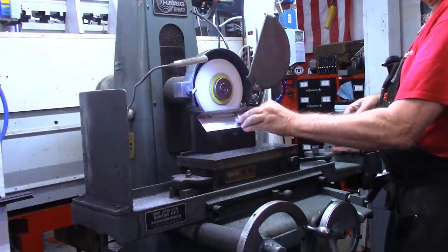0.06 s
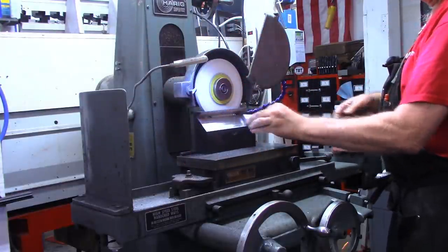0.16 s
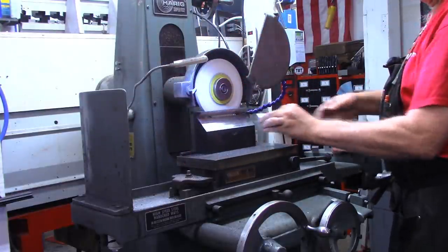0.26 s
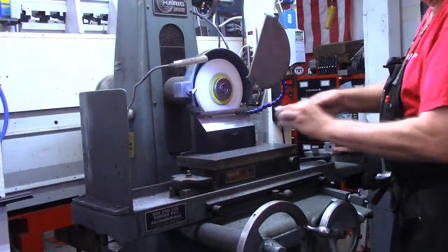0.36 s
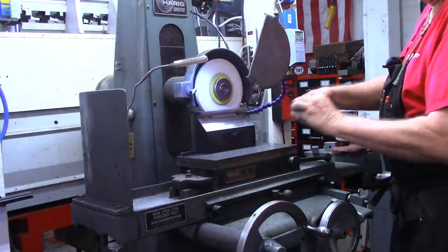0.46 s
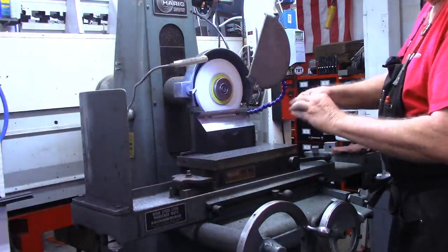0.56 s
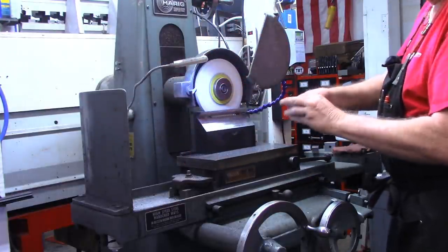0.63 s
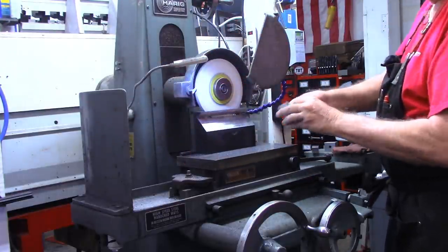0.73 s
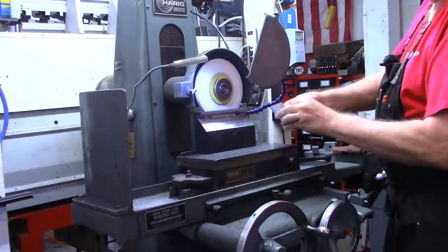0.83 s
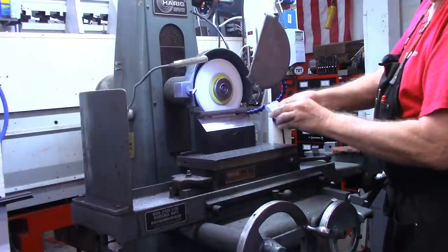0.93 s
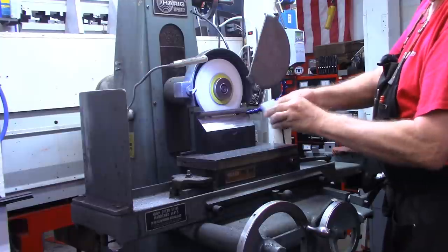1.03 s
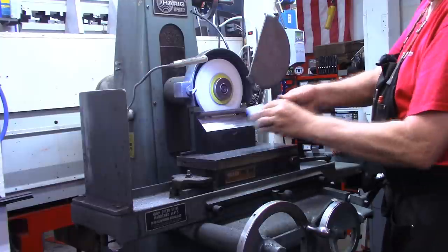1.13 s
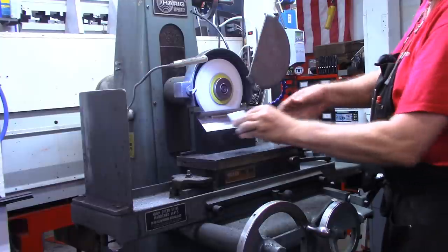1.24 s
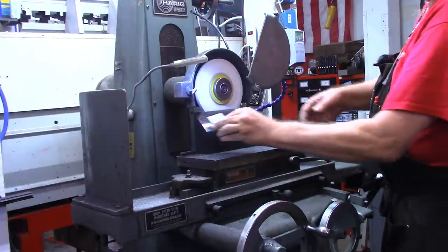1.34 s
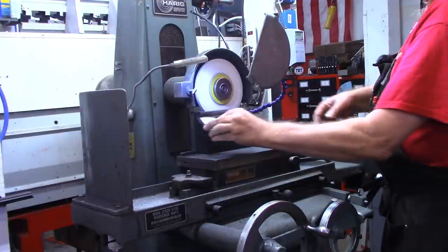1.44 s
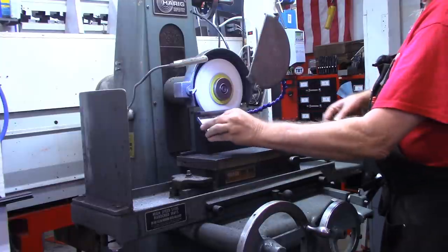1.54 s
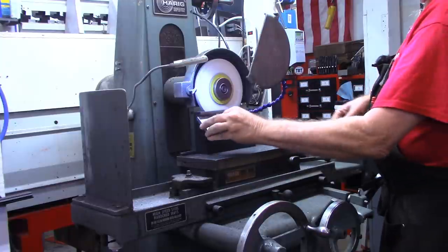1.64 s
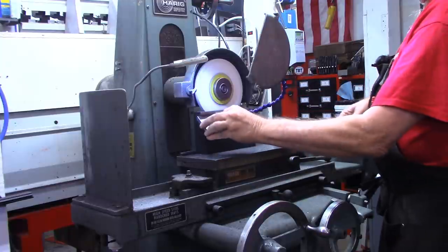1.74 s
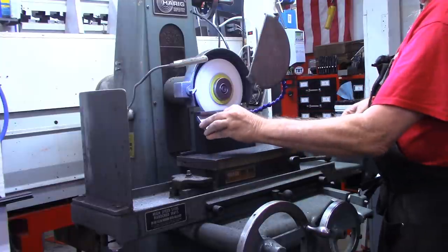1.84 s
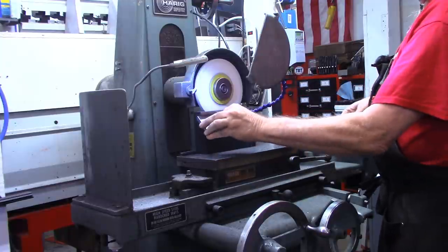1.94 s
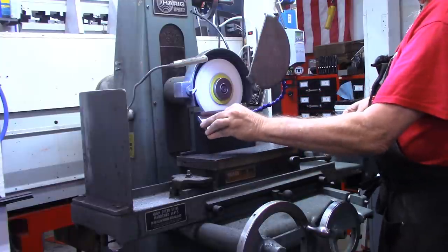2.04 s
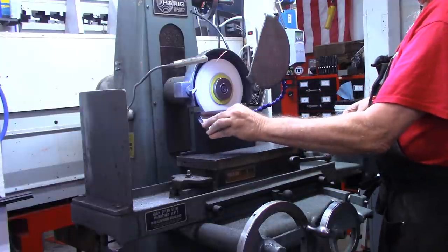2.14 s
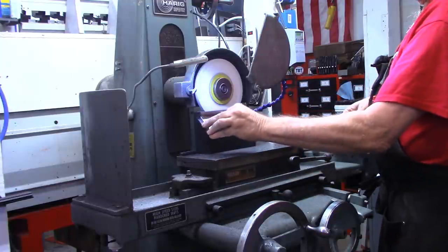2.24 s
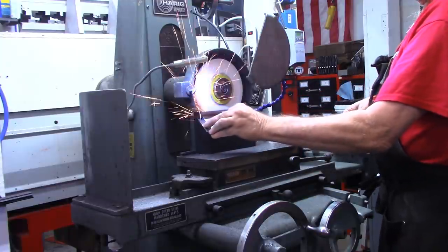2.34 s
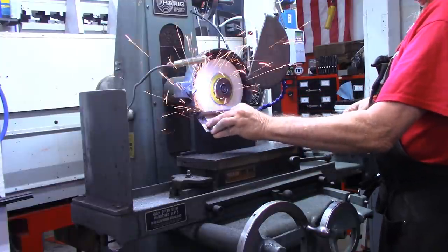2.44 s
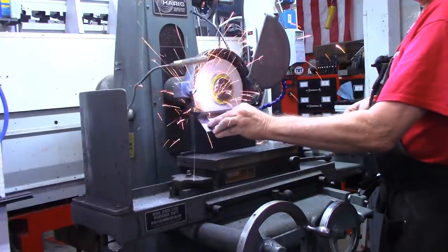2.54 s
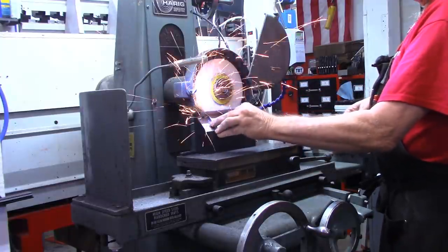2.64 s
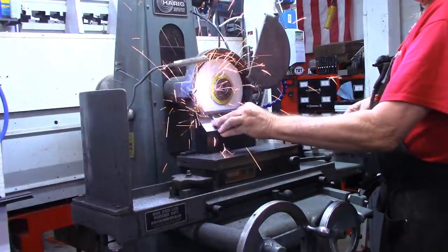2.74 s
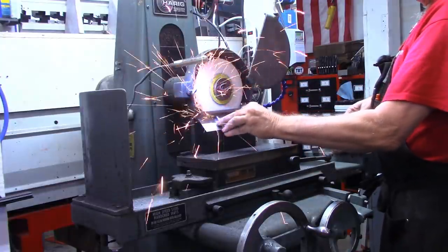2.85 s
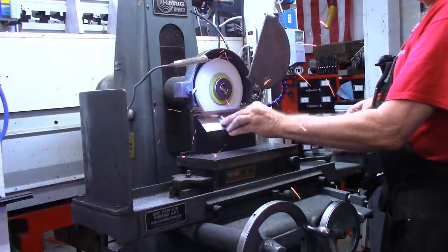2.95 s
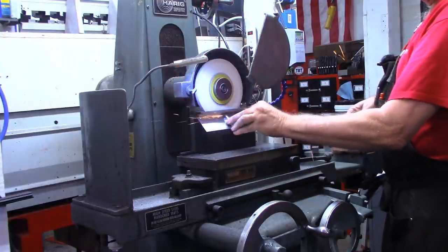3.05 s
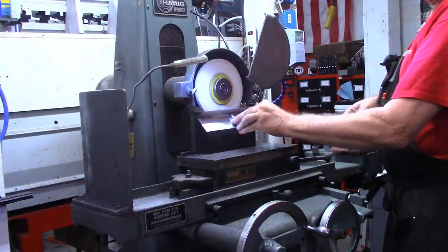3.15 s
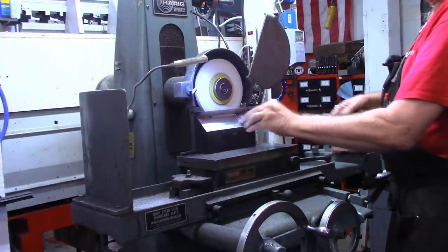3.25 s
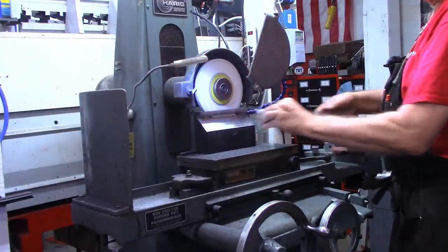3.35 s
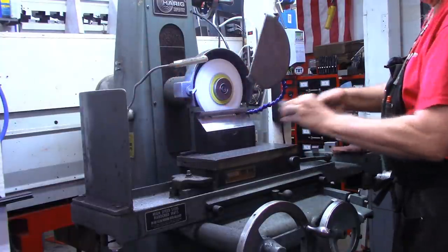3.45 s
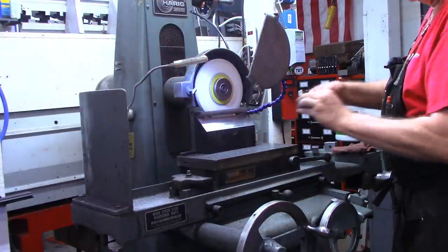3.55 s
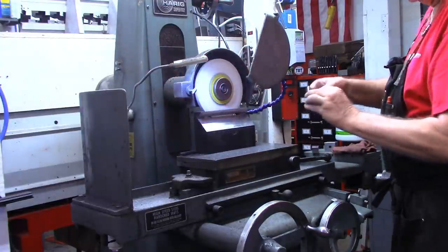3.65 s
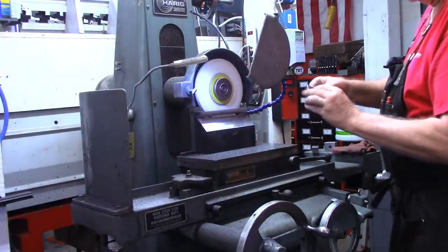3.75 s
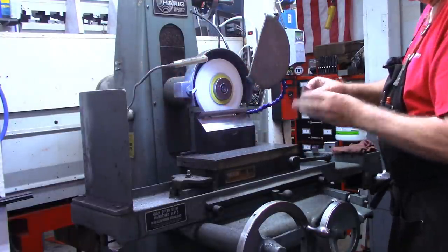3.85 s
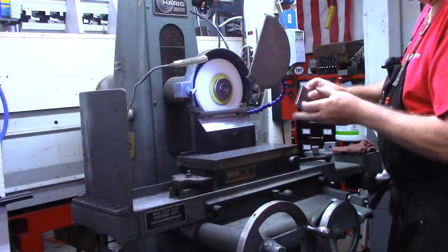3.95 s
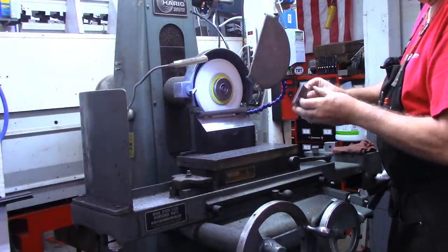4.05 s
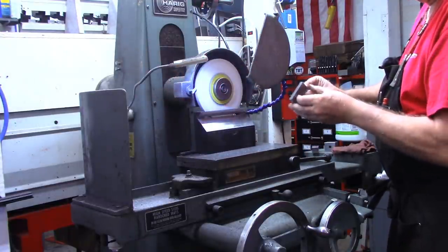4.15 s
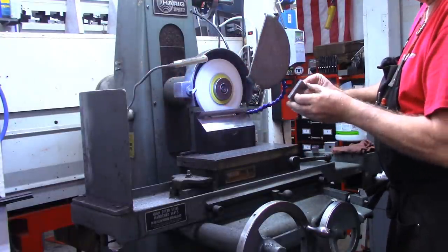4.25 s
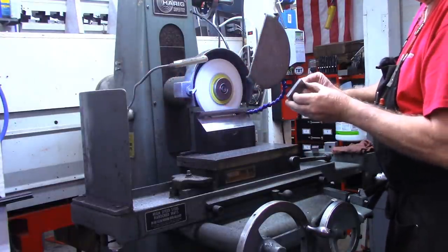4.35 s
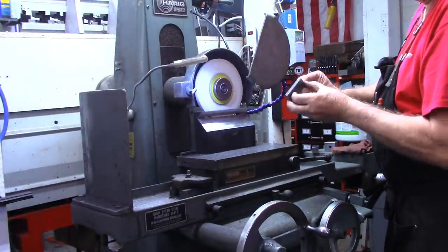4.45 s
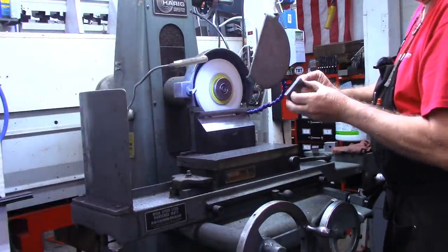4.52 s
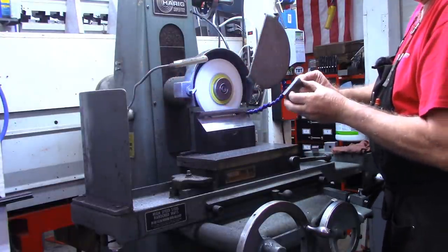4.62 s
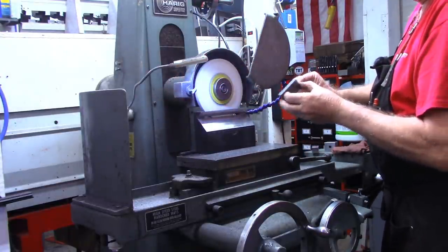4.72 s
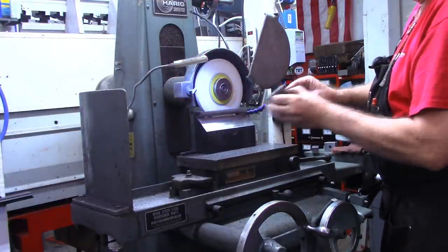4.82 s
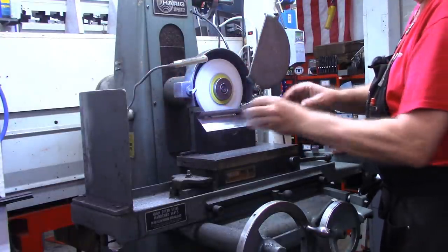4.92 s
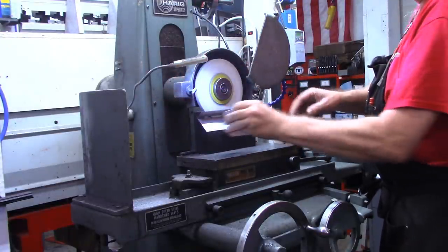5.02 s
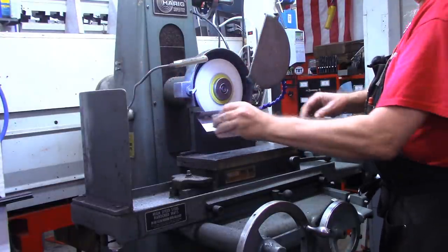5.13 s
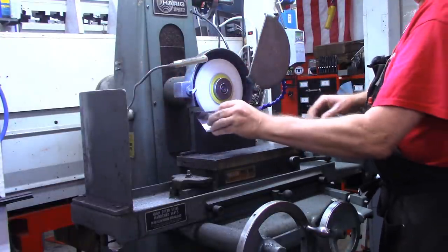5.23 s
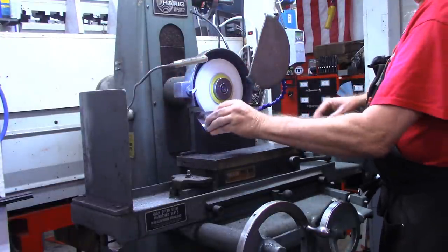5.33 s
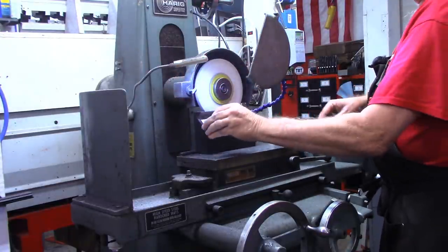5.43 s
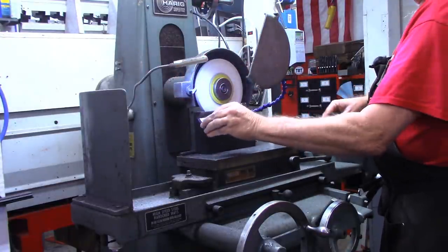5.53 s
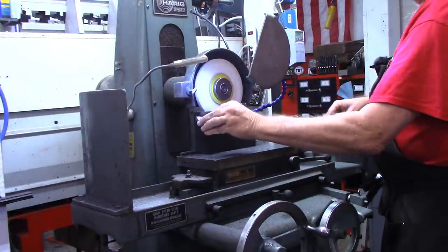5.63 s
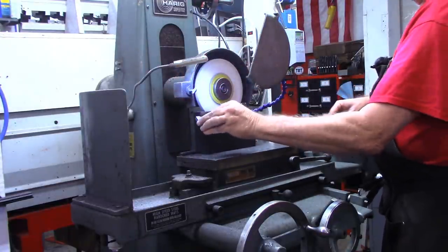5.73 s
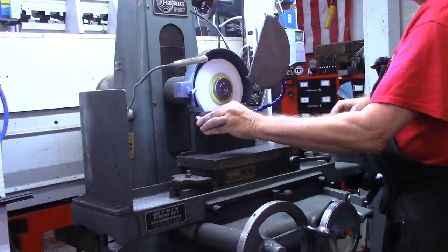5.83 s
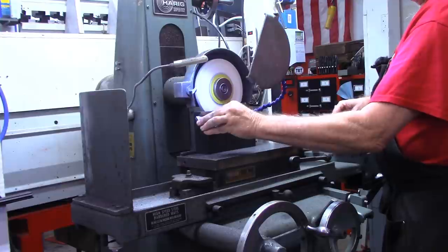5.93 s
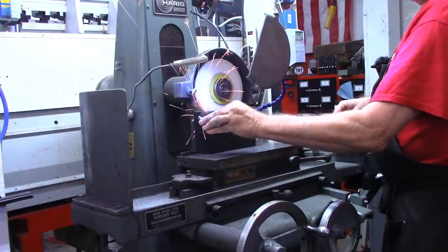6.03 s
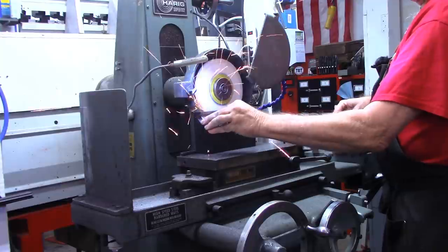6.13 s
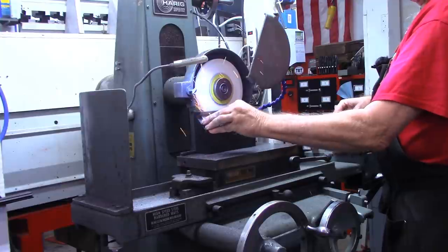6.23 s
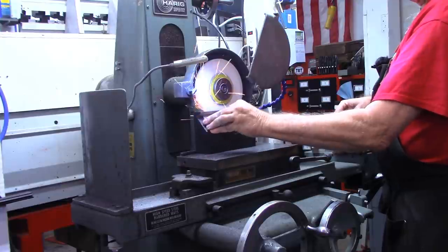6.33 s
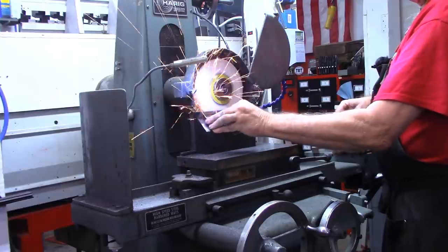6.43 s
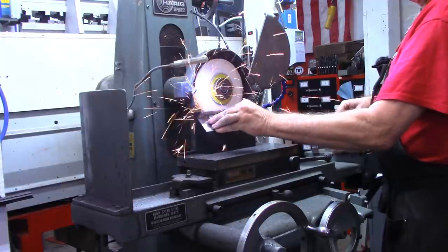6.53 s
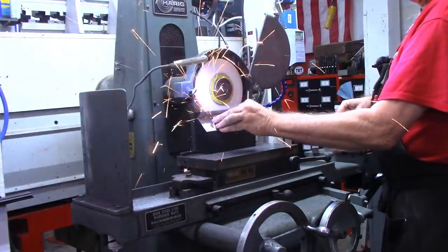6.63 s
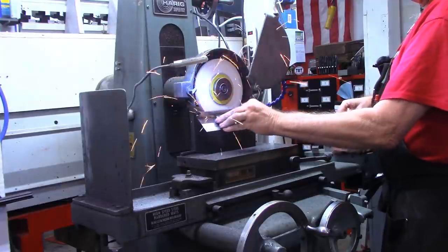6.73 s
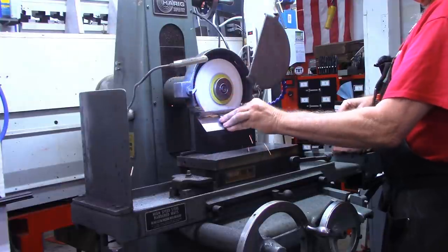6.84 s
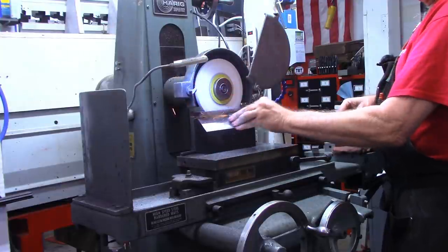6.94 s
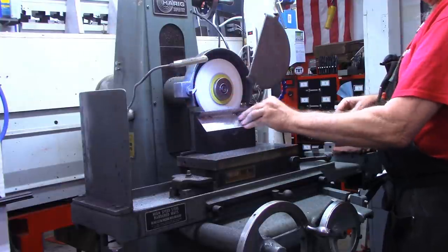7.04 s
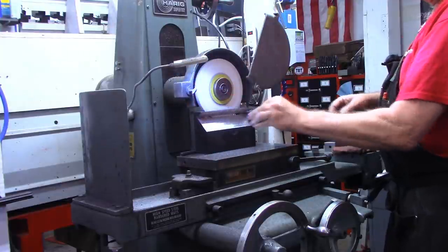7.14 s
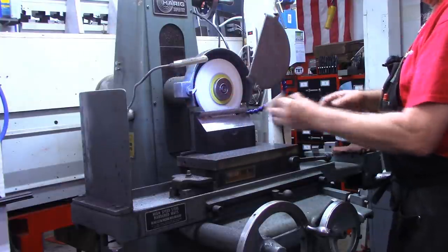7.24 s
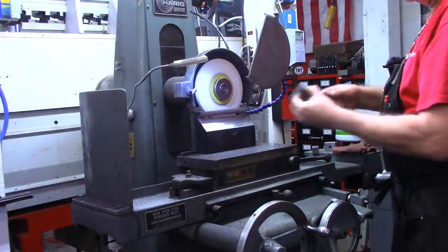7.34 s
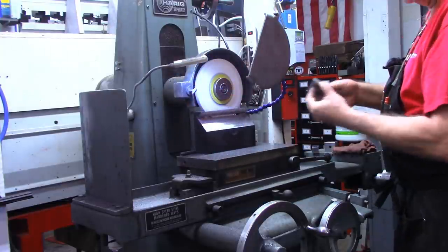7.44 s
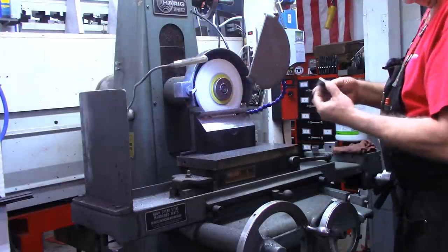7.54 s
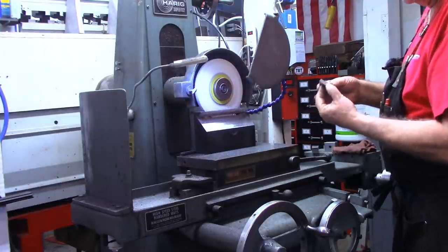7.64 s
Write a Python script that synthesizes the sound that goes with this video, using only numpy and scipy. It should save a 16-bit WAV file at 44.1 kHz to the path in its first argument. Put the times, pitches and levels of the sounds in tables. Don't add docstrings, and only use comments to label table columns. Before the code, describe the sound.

Faint motor hum and airy whirr, broken twice by a piercing, gritty metallic screech as steel is drawn under a grinding wheel.

```python
import sys
import numpy as np
from scipy import signal
from scipy.fft import rfft, irfft, next_fast_len
from scipy.io import wavfile
from scipy.ndimage import uniform_filter1d, map_coordinates

SR = 44100
rng = np.random.default_rng(int(sys.argv[2]) if len(sys.argv) > 2 else 0)


def voltage_ratio(level):
    return 10 ** (np.asarray(level, float) / 20)


def output_pcm(signal):
    pcm = np.clip(np.atleast_2d(signal).T, -1, 1) * 32767
    wavfile.write(sys.argv[1], SR, np.round(pcm).astype(np.int16))


N = 338688
TOP_HZ = 15340


def unit(x):
    return x / np.sqrt(np.mean(x ** 2) + 1e-20)


def along(points, hz):
    f, v = np.transpose(points)
    return np.interp(np.log(hz + 1), np.log(f + 1), v)


def wobble(rate):
    return map_coordinates(rng.standard_normal(int(N * rate / SR) + 4), [np.arange(N) * rate / SR])


def filtered(x, response):
    m = next_fast_len(N + SR // 2)
    return irfft(rfft(x, m) * response(np.fft.rfftfreq(m, 1 / SR)), m)[:N]


def colour(points):
    return lambda f: voltage_ratio(along(points, f))


def modes(table, shift=1, damp=1):
    def peak(f, hz, width):
        return 1j * f * width / (hz * hz - f * f + 1j * f * width)

    def response(f):
        total = 0
        for hz, width, db in table:
            ring = peak(f, hz * shift, width * damp) * peak(f, hz, 1300 + 4 * width)
            total = total + voltage_ratio(db) / np.sqrt(damp) * ring
        return total
    return response


def steep(table):
    return lambda f: modes(table)(f) ** 2


def driven(force, db, response):
    size = np.sqrt(np.mean(np.abs(response(np.arange(1, TOP_HZ + 900, 2))) ** 2))
    return filtered(force * voltage_ratio(db), response) / size


def gliding(force, hz, steps_hz, width_hz):
    distance = np.abs(hz - steps_hz[:, None]) / (steps_hz[1] - steps_hz[0])
    weights = np.sqrt(np.clip(1 - distance, 0, 1))
    out = sum(filtered(force * w, steep([(centre, width_hz, 0)])) for centre, w in zip(steps_hz, weights))
    return out / np.sqrt(np.pi / 2 * width_hz / SR)


def patchy(x, patchy_db):
    z = signal.stft(x, nperseg=2048)[2]
    field = uniform_filter1d(rng.standard_normal(z.shape), size=3, axis=0)
    field = uniform_filter1d(field, size=7, axis=1)
    return signal.istft(z * voltage_ratio(patchy_db * unit(field)), nperseg=2048)[1][:N]


def idle():
    # (frequency [Hz], level per Hz [dB])
    air_colour = [(12, -39), (20, 7.5), (64, -10), (85, -11), (118, -4), (140, -9.5), (243, -6.5),
                  (272, -11), (339, -4), (473, -5), (1120, 1), (3590, -14), (5150, -9), (6250, -12.5),
                  (10500, -26), (15200, -38)]
    air_db = -57.5
    # (frequency [Hz], rms level [dB])
    hum = [(59.2, -76), (107.7, -84), (344.5, -86), (419.9, -85), (559.9, -84), (807.5, -77), (1120, -77),
           (1384, -77), (1992, -77), (2272, -82), (4285, -87), (4840, -86), (4963, -79), (5082, -79),
           (5206, -76), (5324, -80), (9685, -93), (9803, -98), (9927, -97), (10045, -96), (10164, -100),
           (10406, -94)]
    t = np.arange(N) / SR
    z = signal.stft(rng.standard_normal(N), nperseg=512)[2]
    field = uniform_filter1d(rng.standard_normal(z.shape), 6, 0)
    field = uniform_filter1d(field, 12, 1)
    gusts = signal.istft(z * voltage_ratio(0.93 * unit(field)), nperseg=512)[1][:N]
    air = unit(filtered(gusts, colour(air_colour)))
    tones = 0
    for hz, db in hum:
        swell = voltage_ratio(db + 3.0 + 2.2 * wobble(1.513) + 2.2 * wobble(7))
        tones = tones + swell * np.sin(2 * np.pi * hz * t + 1.24 * wobble(6))
    return voltage_ratio(air_db - 0.87 + 0.38 * wobble(2.97)) * air + tones


def bumps():
    # (time [s], peak level [dB], half-length [ms])
    knocks = [(0.089, -48.5, 1.6), (.683, -51.5, 1.6), (0.911, -61, 3.9), (1.443, -54, 2.2),
              (1.769, -53, 1.6), (1.817, -57, 8.5), (2.06, -59, 8.9), (2.105, -55, 1.7), (2.304, -48, 1.4),
              (3.258, -47.5, 1.5), (5.02, -57, 5), (5.046, -45.5, 1.4), (5.132, -57.5, 2.3),
              (5.84, -53, 1.2), (5.877, -51.5, 2.6), (5.93, -54.5, 12), (6.07, -52, 1.2),
              (6.257, -50.5, 1.5), (7.137, -52.5, 1.8), (7.491, -58.5, 2.7)]
    t = np.arange(-SR // 20, SR // 8) / SR
    out = np.zeros(N)
    for s, db, ms in knocks:
        u = 1000 * t / ms
        push_pull = u * np.exp(.5 - u * u / 2)
        sway = voltage_ratio(-9.5 - 60 * np.abs(t) / 0.24) * np.sin(2 * np.pi * 38 * t - 2.5) * (t > -.012)
        out[round(s * SR) - SR // 20:][:len(t)] += voltage_ratio(db - 3.0) * (sway - push_pull)
    return out


def ticks():
    # (time [s], peak level [dB], thud [dB], 6.3 kHz ring [dB], chime [dB])
    scrapes = [
        (1.5582, -44.5, -3.5, -17, -5),
        (1.8536, -39.5, -4.5, -9, -36),
        (5.476, -56, -8, -20, -3),
    ]
    # (frequency [Hz], width [Hz], level [dB])
    rest = [(1150, 1000, 6), (3000, 2200, 4), (6340, 1100, 0)]
    t = np.arange(SR // 6) / SR
    tracks = np.zeros((4, N))
    for s, db, thud_db, ring_db, chime_db in scrapes:
        decay = voltage_ratio(-60 * t / 0.04) + voltage_ratio(-14.5 - 60 * t / 0.22)
        burst = voltage_ratio(db) * decay * rng.standard_normal(len(t))
        shares = voltage_ratio([[thud_db + 6.5], [2.5], [ring_db + 11.5], [chime_db + 14.0]])
        tracks[:, round(s * SR):round(s * SR) + len(t)] = shares * burst
    return sum(filtered(track, steep([mode])) for track, mode in zip(tracks, rest + [(9000, 220, 0)]))


def contact():
    # (time [s], pressure [dB], seating [0 corner - 1 full face],
    # lean across the rim [0-1], place along the piece [0-1])
    grazes = [
        [(2.172, -54.5, .2, .7, .2), (2.184, -34, 0.15, 0.94, 0.3), (2.212, -30, .1, 1, 0),
         (2.298, -41, .1, 0.3, 0), (2.352, -31, 0.12, 0.5, 0.1), (2.36, -25, 0.25, 0.4, 0.6)],
        [(5.715, -33.5, 0.25, 0.7, 0.28), (5.738, -33, .2, 0.53, 0.43), (5.748, -51, .2, 0.5, .2),
         (5.78, -57.5, .2, 0.6, .2)],
    ]
    # (time [s], pressure [dB], seating [0-1], lean [0-1], place [0-1])
    bites = [
        [(2.36, -28.5, 0.27, .4, .2), (2.394, -23, 0.29, 0.84, 0.16), (2.494, -24, 0.79, 0.68, 0.28),
         (2.602, -23, 0.28, 0.97, 0.45), (2.704, -24, 0.64, .8, .48), (2.812, -25, 0.89, 0.96, 0.86),
         (2.914, -26, 0.96, .9, 1), (2.936, -24.5, 0.55, 0.92, 0.76)],
        [(6.02, -60, 0.069, 0.24, 0.3), (6.033, -34, .1, 0.28, 0.16), (6.069, -23, 0.17, 0, 0.4),
         (6.103, -24.5, 0, 0.066, 0.45), (6.149, -24.5, 0.22, 0.22, 0.39), (6.22, -23.5, 0.33, 0.058, 0.51)],
        [(6.396, -24, 0.78, .4, 0.21), (6.436, -23.5, 0.64, 0.31, 0.43), (6.492, -24.5, 1, .2, 0.34),
         (6.584, -27, 1, 0.53, 0.59), (6.654, -28, 1, 0.48, 0.67), (6.712, -27, 0.5, 0.5, .65),
         (6.788, -32.5, 0.99, 0.49, .8), (6.81, -31, .6, .4, 0.76)],
    ]
    bite_slip = [0.057, 0.049, 0.19]
    # (start [s], end [s], pressure at start [dB], at end [dB],
    # seating [0-1])
    skates = [
        (2.935, 3.159, -39, -42, .1),
        (6.218, 6.393, -32.5, -28, 0.1),
        (6.806, 7.073, -39.5, -42, .9),
    ]
    # (start [Hz], middle [Hz], end [Hz])
    overhang = [
        (3050, 3000, 2600),
        (2300, 2860, 2550),
        (2530, 2780, 2240),
    ]
    skating, skate_lean, skate_place = 0.92, 0.48, 0.3
    lift_s, lift_db, blend_s = 0.04, 24.5, .012
    t = np.arange(N) / SR
    controls = np.zeros((6, N)) + [[-120], [0], [0], [0], [0], [overhang[0][1]]]
    for rows, slip in zip(grazes + bites, [bite_slip[0]] * len(grazes) + bite_slip):
        s, *cols = np.transpose(rows)
        on = (t >= s[0]) & (t < s[-1] + blend_s * (len(rows) > 4))
        controls[:5, on] = [np.interp(t[on], s, c) for c in cols] + [np.full(on.sum(), slip)]
    for (start, end, first_db, last_db, seat), free_hz in zip(skates, overhang):
        on = (t >= start) & (t < end + lift_s) & ((t < end) | (controls[0] < -100))
        u = np.clip((t[on] - start) / (end - start), 0, 1)
        controls[0, on] = np.interp(t[on], [start, end, end + lift_s], [first_db, last_db, last_db - lift_db])
        controls[1:5, on] = [[seat], [skate_lean], [skate_place], [skating]]
        controls[5, on] = np.polyval(np.polyfit([0, .5, 1], free_hz, deg=2), u)
    return controls


def passes():
    # (level over pressure [dB],
    # extra [dB per dB], for full seating [dB], for full lean [dB], when skating [dB])
    answers = [(-14.5, 0.5, 0, 10, 4.5), (0, 0, -2, -14, -1), (1, 0, -0.5, -1, -5.5),
               (-16.5, 0.17, 5.5, 1, -1.5), (-23, 0.5, 6, 1.5, -10.5), (-13.5, 0, -5, -3.5, -3),
               (-24.5, 0, 0, -3.5, -1), (-7.5, 0, 0.5, 0.5, 4), (-26.5, -0.04, 10, -1, -4),
               (-16, 0, 5, -2.5, 10.5), (-17.5, -0.1, 2.5, -1.5, 9), (-10.5, 0, -2.5, 0.5, -2),
               (-22, 1.2, 4.5, 0.5, 4.5)]
    firm_db, drift_db = -24.5, 0.74
    flex_db, flex_grows = -16.5, 0.85
    free_turns, sag_turns, stall_db, sag_s = 60.3, .34, -30, .11
    pressure_db, seat, lean, place, skate, low_hz = contact()
    skate = np.clip(skate, 0, 1)
    extra_db = pressure_db - firm_db
    levels = []
    for db, grows, seated_db, lean_db, skating_db in answers:
        pose_db = seated_db * seat + lean_db * lean + skating_db * skate
        levels.append(pressure_db + db + grows * extra_db + pose_db + drift_db * wobble(9))
    levels[-2] = levels[-2] + 20 * np.log10(np.abs(np.cos(np.pi * place)) + .03)
    levels.append(pressure_db + flex_db + flex_grows * extra_db)
    keep = np.exp(-1 / (sag_s * SR))
    load = signal.lfilter([1 - keep], [1, -keep], np.minimum(voltage_ratio(pressure_db - stall_db), 1))
    return levels, skate, low_hz, np.cumsum(free_turns - sag_turns * load) / SR


def grit(turns, keep):
    rim_points = 2048
    fresh = rfft(rng.standard_normal((int(turns[-1]) + 2, rim_points)), axis=1)
    hz = np.arange(rim_points // 2 + 1) * 60
    kept = np.clip(along(keep, hz), 0, .99)
    worn = [fresh[0]]
    for new in fresh[1:]:
        worn.append(kept * worn[-1] + np.sqrt(1 - kept ** 2) * new)
    evened = np.array(worn) / np.abs(worn) ** .7
    rim = irfft((hz < TOP_HZ + 900) * evened, rim_points, axis=1).ravel()
    return unit(map_coordinates(rim, [turns * rim_points]))


def steel_piece(force, runout, skate, low_hz, levels):
    # (frequency [Hz], width [Hz], level [dB])
    chime = [(8910, 200, 6)]
    # (frequency [Hz], level per Hz [dB])
    table_colour = [(130, -67), (280, -12), (450, -11.5), (650, 4), (900, -1.5), (1200, -24.5), (1800, -58)]
    # (frequency [Hz], level per Hz [dB])
    flat_colour = [(600, -37), (1000, -6.5), (1400, 3.5), (1900, 6.5), (2400, 1), (3000, -6.5),
                   (3500, -7.5), (4500, -48)]
    # (frequency [Hz], level per Hz [dB])
    hiss = [(2500, -63), (3500, 7), (4500, 22), (5300, 9.5), (5900, 19.5), (7700, -15.5), (9400, -17),
            (11000, -5), (12100, -24.5), (12800, -38.5), (13700, -32.5), (14800, -27), (16000, -43)]
    # (frequency [Hz], level per Hz [dB])
    rasp = [(500, -57), (1500, -15), (3300, 1), (5300, 5.5), (8000, -7), (12000, -36), (15500, -38)]
    table_db, piece_db, hiss_db, chime_db, rasp_db, flex_db = levels
    chips = unit(runout * voltage_ratio(3.3 * wobble(70)) * rng.standard_normal(N))
    scrape = np.sqrt(.5) * (force + chips) * skate
    high_hz = 4620 + .3 * (low_hz - 2800)
    out = driven(force, table_db - 2.5, colour(table_colour))
    out += driven(force, hiss_db + 4.5, colour(hiss))
    out += driven(np.sqrt(1 - skate) * force + np.sqrt(skate) * chips, rasp_db, colour(rasp))
    out += driven(unit(force * runout), chime_db, modes(chime))
    out += driven(force * np.sqrt(1 - 0.94 * skate), piece_db, colour(flat_colour))
    out += gliding(scrape * voltage_ratio(piece_db - 4.5), low_hz, np.arange(2150, 3500, 240), width_hz=550)
    out += gliding(scrape * voltage_ratio(piece_db + 2), high_hz, np.arange(4100, 5100, 240), width_hz=330)
    out += driven(force * skate ** 2, flex_db, modes([(1110, 100, 0)]))
    return out


def ringing_wheel(force, skate, angle, ring_db):
    # (frequency [Hz], ..)
    pitches = [
        [3942],
        [4290],
        [6625],
        [9800, 10400, 11530],
        [1385, 1742, 1950],
        [2165],
        [13365, 14090],
        [7100],
    ]
    # (width [Hz], level [dB])
    widths = [
        [(34, 0)],
        [(26, 0)],
        [(22, 0)],
        [(16, -3), (23.8, -1), (16.03, -13)],
        [(20, -6.5), (16.15, 0), (24, -2)],
        [(14, 0)],
        [(16, 1.5), (20, 2)],
        [(26, 0)],
    ]
    flat, edge = force * np.sqrt(1 - skate), force * np.sqrt(skate)
    out = 0
    for db, group_hz, group, held_db in zip(ring_db, pitches, widths,
                                            [1.4, -7.0, -1.0, 2.0, -2.5, 0.5, 1.3, 0.3]):
        group = [(hz, width, level) for hz, (width, level) in zip(group_hz, group)]
        free, held = modes(group), modes(group, 1.006, damp=0.8)
        out = out + driven(flat, db, free) + driven(edge, db + held_db, held)
    return out * voltage_ratio(1.0 * np.cos(angle - .6) + 0.36 * np.cos(2 * angle + .3))


def cut():
    levels, skate, low_hz, turns = passes()
    angle = 2 * np.pi * turns
    high_spots_db = 0.87 * np.cos(angle + 0.42) + 0.55 * np.cos(2 * angle + 4.0)
    runout = voltage_ratio(high_spots_db + 0.53 * wobble(25))
    loose = np.clip(0.1 + 0.52 * skate, 0, 1)
    rim = grit(turns, keep=[(500, 0.95), (4000, 0.94), (8000, 0.942), (14000, 0.3)])
    force = unit(runout * (np.sqrt(1 - loose) * rim + np.sqrt(loose) * rng.standard_normal(N)))
    piece = steel_piece(force, runout, skate, low_hz, levels[8:])
    wheel = ringing_wheel(force, skate, angle, levels[:8])

    def no_bass(f):
        ratio = 250 / (1j * f + 1)
        return 1 / (1 + ratio * 1.5 + ratio ** 2) ** 2
    return filtered(patchy(piece, patchy_db=3.5) + wheel, no_bass)


def shop(x):
    # (frequency [Hz], time to fall 60 dB [s])
    echo_s = [(200, 0.36), (2000, 0.45), (6000, 0.23), (14000, 0.36)]
    hz, t, z = signal.stft(rng.standard_normal(SR // 2), SR, nperseg=256)
    tail = signal.istft(z * voltage_ratio(-60 * t / along(echo_s, hz)[:, None]), SR, nperseg=256)[1]
    return signal.fftconvolve(np.pad(x, (300, 0)), tail / np.linalg.norm(tail))[:N]


def scene():
    work = cut() + ticks()
    return (voltage_ratio(-1.0) * work + voltage_ratio(-8.5) * shop(work) + bumps() + idle())[None]


def top_cut(x):
    return signal.sosfilt(signal.butter(12, 15520, fs=SR, output="sos"), x)


def record(dry):
    mix = filtered(dry[0], lambda f: f < TOP_HZ)[None]
    return top_cut(mix)


dry = scene()
out = record(dry)
output_pcm(out)
```